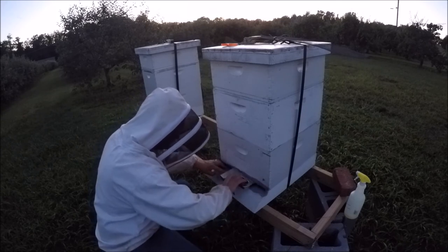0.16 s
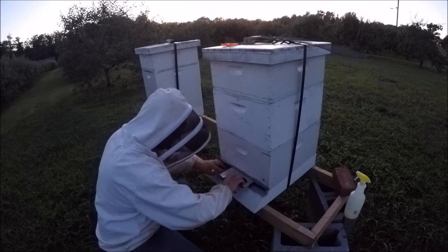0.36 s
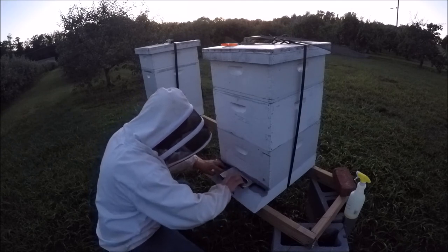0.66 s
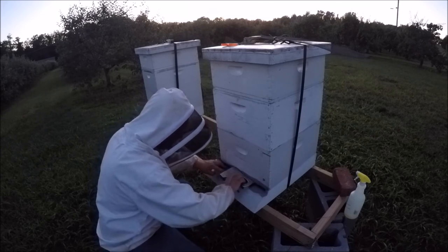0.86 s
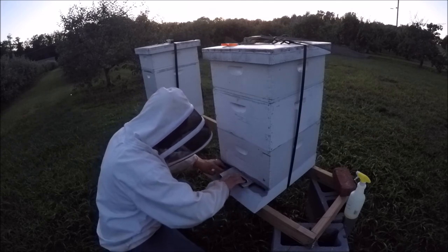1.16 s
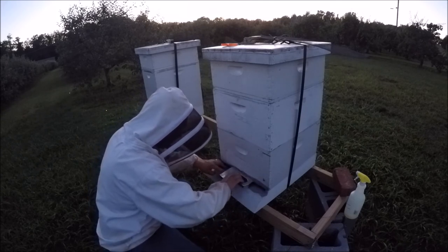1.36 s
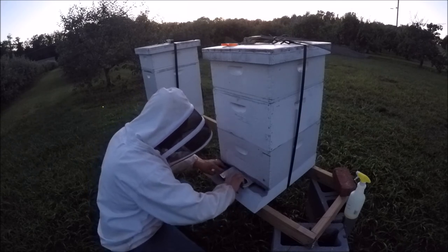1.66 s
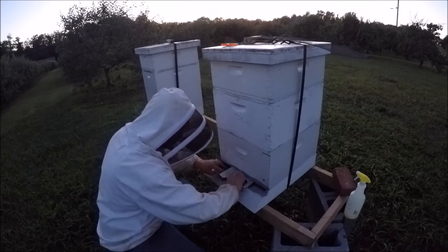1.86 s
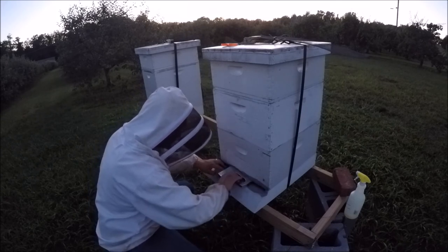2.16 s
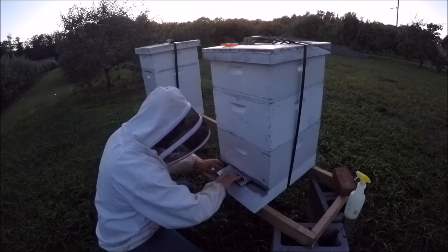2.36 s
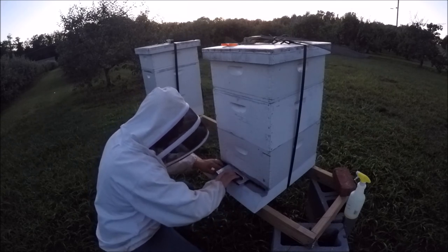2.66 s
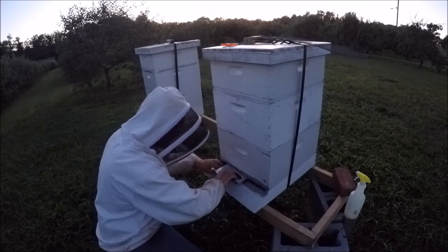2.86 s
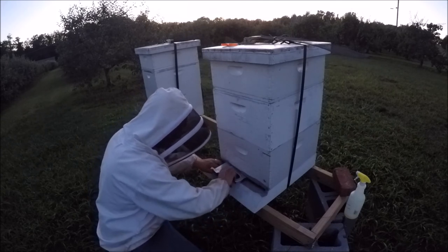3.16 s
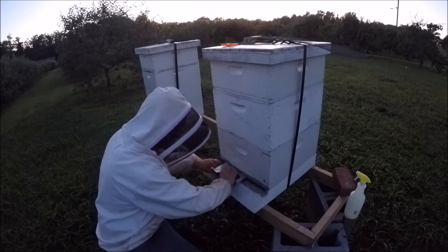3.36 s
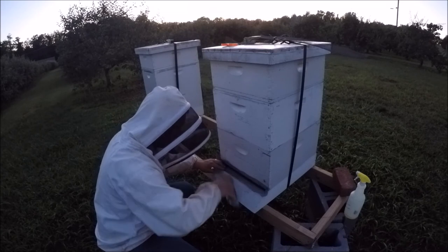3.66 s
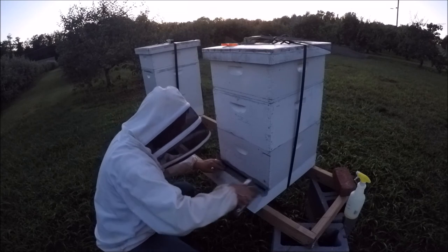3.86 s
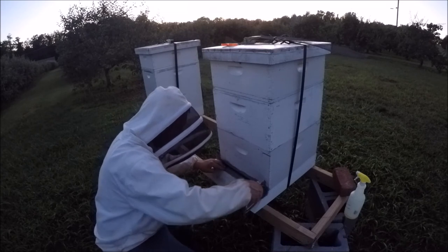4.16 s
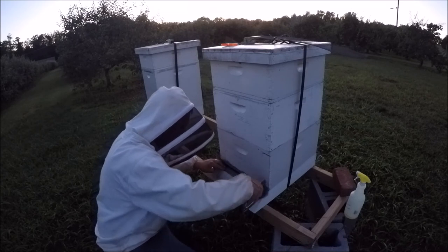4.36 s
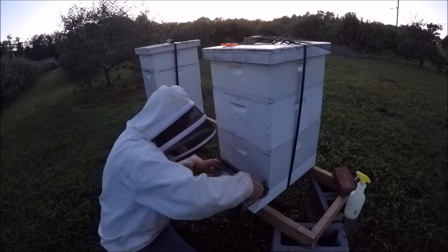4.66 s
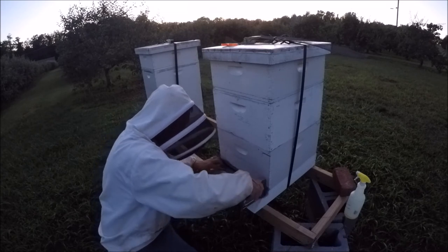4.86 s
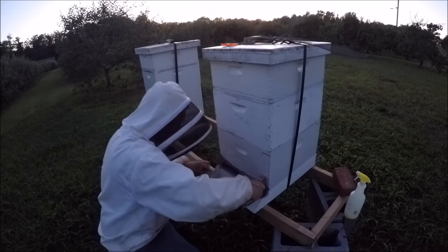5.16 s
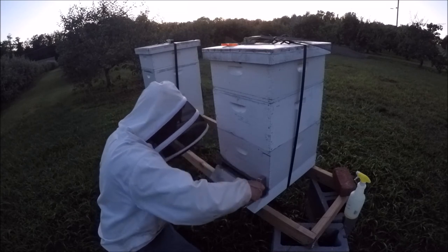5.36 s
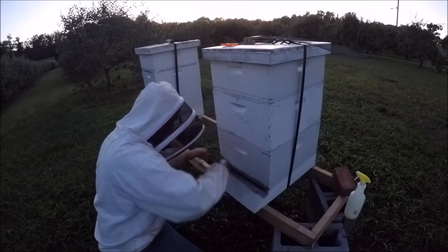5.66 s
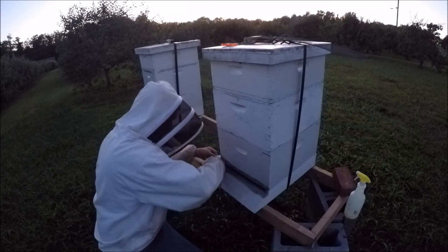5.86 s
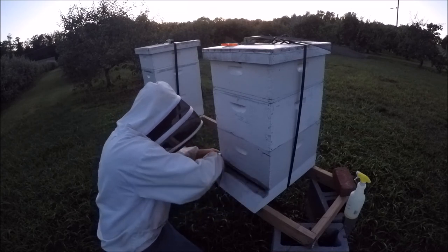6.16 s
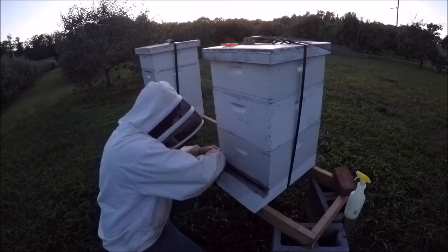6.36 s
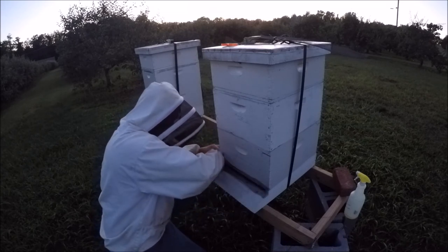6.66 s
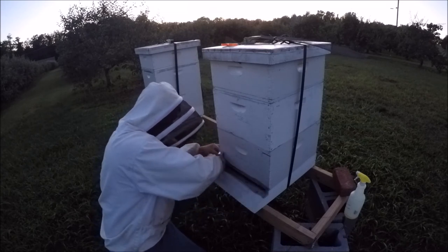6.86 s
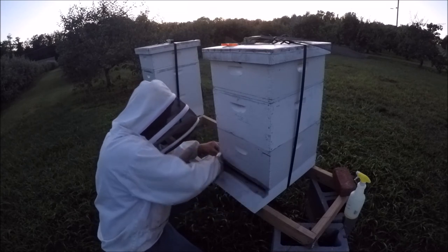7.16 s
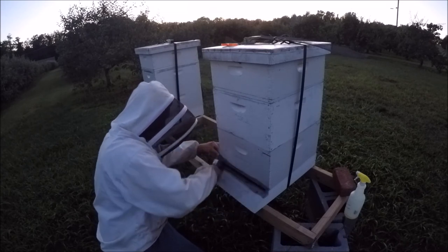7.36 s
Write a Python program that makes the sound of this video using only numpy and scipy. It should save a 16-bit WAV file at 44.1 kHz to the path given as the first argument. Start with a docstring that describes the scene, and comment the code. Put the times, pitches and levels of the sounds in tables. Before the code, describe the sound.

A hand stapler cracks four times into a boxy wooden hive, with metal clicks, wood bumps and sliding between, over a quiet rumbling field.

```python
"""A beekeeper staples a strip across the entrance of a wooden hive, outdoors, two metres from the microphone.
Throughout, the field rumbles and hisses (shaped noise) and bees hum in the box (wandering harmonic tones).
A small bird trills at the start (gliding tones), while gun and strip knock, click and slide (struck modes).
Staples slam home near 1.9, 3.4, 5.4 and 7.0 s (noise bursts and modes), clipping wherever they exceed full scale.
A sleeve rustles (shaped noise) after 4.2 s and again around 6 s; the bird trills once more from 5.7 s."""
import sys
import numpy as np
from scipy import signal
from scipy.fft import rfft, irfft, next_fast_len
from scipy.io import wavfile

SR = 44100
rng = np.random.default_rng(int(sys.argv[2]) if len(sys.argv) > 2 else 0)


def persist_wave(psi):
    """Save psi, clipped to +-1, as 16-bit WAV."""
    counts = np.round(np.clip(psi, -1, 1) * 32767).astype(np.int16)
    wavfile.write(sys.argv[1], SR, np.atleast_2d(counts).T)


N = 331191
TIME = np.arange(N) / SR  # seconds through the scene
AGE = TIME[:SR // 3]  # seconds since a blow


def undb(db):
    """Decibels to gain."""
    return 10 ** (np.asarray(db) / 20)


def unit(x):
    """Scale to rms 1."""
    return x / np.sqrt(np.mean(x ** 2))


def curve(table, t):
    """The columns of a table, joined by straight lines at times t."""
    s, *columns = np.transpose(table)
    return [np.interp(t, s, c) for c in columns]


def add(track, s, sound):
    """Mix a sound into the track at time s, cutting what falls outside."""
    i = int(s * SR)
    part = sound[max(-i, 0):max(N - i, 0)]
    start = max(i, 0)
    track[start:start + len(part)] += part


def noise(colour, t):
    """Noise of rms 1, as long as t, with a spectrum drawn through (pitch_hz, level_db) points."""
    hz, db = np.transpose(colour)
    size = next_fast_len(len(t))
    f = np.maximum(np.fft.rfftfreq(size, 1 / SR), 1)
    gain = undb(np.interp(np.log(f), np.log(hz), db))
    coloured = irfft(rfft(rng.standard_normal(size)) * gain, size)
    return unit(coloured[:len(t)])


def walk(rate):
    """A random wander with spread near 1, turning at most `rate` times a second."""
    knots = rng.standard_normal(1024)
    return np.interp(TIME * rate, np.arange(len(knots)), knots)


def fade(t60, t=AGE):
    """Exponential decay, down 60 dB after t60 seconds."""
    return np.exp(-np.log(1000) * t / t60)


def swell(t, length):
    """A smooth rise and fall around t = 0."""
    return np.cos(np.pi * np.clip(t / length, -.5, .5)) ** 2


def chirp(hz, db):
    """A pure gliding tone: the phase adds up the changing pitch."""
    return np.sin(2 * np.pi * np.cumsum(hz) / SR) * undb(db)


def ring(modes, scatter_db, phase_spread):
    """Decaying modes, starting near rms 1; each call weights and detunes them a little differently."""
    hz, db, t60 = np.transpose(modes)[:, :, None]
    size, phase, detune = rng.standard_normal((3, len(modes), 1))
    angle = 2 * np.pi * hz * (1 + 0.0031 * detune) * AGE + phase_spread * phase
    waves = np.cos(angle) * fade(t60)
    return np.sum(undb(db + scatter_db * size) * waves, axis=0) / np.sqrt(np.sum(undb(db) ** 2) / 2)


def tone(hz, db, t60):
    """One damped resonance that builds up within its first cycle."""
    return undb(db) * np.cos(2 * np.pi * hz * AGE) * fade(t60) * (1 - fade(.5 / hz))


def scatter(x, t60, db):
    """Diffuse reflections from the surroundings: a fading noise tail, thinner in the treble."""
    t = TIME[:SR]
    colour = [(60, 19.5), (400, 2), (1500, -5.5), (5000, -7.0), (15000, -5)]  # (pitch_hz, relative dB per Hz)
    tail = noise(colour, t) * fade(t60, t) * (1 - fade(0.11, t))
    return undb(db) * signal.fftconvolve(x, tail / np.sqrt(np.sum(tail ** 2)))[:N]


# colour of the open air: pitch_hz [Hz], level_db [relative dB per Hz]
AIR_COLOUR = [(12, -32.5), (20, 5), (57, 0), (160, -12.5), (229, -13), (294, -20), (445, -16), (540, -22.5),
              (713, -26), (796, -29), (1210, -22.5), (1420, -28), (4690, -33.5), (13400, -46.5),
              (15000, -47.5)]
# course of the distant hiss: time_s [s], level_db [dB, before the shared trim]
HISS_LEVEL = [(0, -59.5), (1.7, -62.5), (3.2, -61), (3.9, -65.5), (4.6, -65), (5.2, -59.5), (6.4, -61.5),
              (7.5, -61)]
# colour of the distant hiss: pitch_hz [Hz], level_db [relative dB per Hz]
HISS_COLOUR = [(200, -7.5), (500, -2), (800, 3), (1300, 3.5), (2500, -5.5), (4300, -3), (7000, -15),
               (15000, -19.5)]


def field(air_db=-51.5, hiss_trim_db=-3.5):
    """Low rumble of the open air and a distant hiss: two shaped noises whose levels waver."""
    hiss_db, = curve(HISS_LEVEL, TIME)
    air = noise(AIR_COLOUR, TIME) * undb(air_db + 0.96 * walk(11))
    return air + noise(HISS_COLOUR, TIME) * undb(hiss_db + hiss_trim_db + 1.1 * walk(17))


# the colony: time_s [s], wingbeat_hz [Hz, middle of the wander], level_db [dB, before the shared trim]
COLONY = [(0, 244, -52.5), (1.5, 234.5, -52.5), (3, 244.2, -51), (3.9, 241.2, -59), (4.4, 239.3, -55.5),
          (5.1, 225.1, -53), (6.3, 243.5, -56.5), (7.5, 246.4, -56)]


def bees(count=7, trim_db=-8):
    """Several bees in the box, each with its own wandering wingbeat, two overtones and changing loudness."""
    hz, db = curve(COLONY, TIME)
    hum = 0
    for _ in range(count):
        wingbeat = hz * (1 + 0.047 * walk(1.3) + 0.0086 * walk(23))
        phase = 2 * np.pi * np.cumsum(wingbeat) / SR
        buzz = np.sin(phase) + undb(-3.5) * np.sin(2 * phase) + undb(-15.0) * np.sin(3 * phase)
        hum = hum + buzz * undb(9.1 * walk(9))
    return unit(hum) * undb(db + trim_db)


SYLLABLE_S = .101  # from one syllable to the next
SWELL_FROM_S, SWELL_S, SWELL_DB = 5.7, .55, -6.5  # the later trill starts about this much softer and swells
# a syllable's parts: pitch at the middle, rise, length, and lead before the whistle
WHISTLE_HZ, WHISTLE_HZ_PER_S, WHISTLE_S = 6700, 80000, .024
NOTE_HZ, NOTE_HZ_PER_S, NOTE_S, NOTE_LEAD_S = 5220, 32000, .022, .029
BUZZ_HZ_PER_S, BUZZ_S, BUZZ_LEAD_S = 14000, .038, .043
# trills: start_s [s, first whistle], end_s [s], whistle_db [dB], buzz_db [dB, before its own 3 dB cut],
# buzz_pitch_hz [Hz], note_db [dB relative to buzz_db]
BIRD_TRILLS = [(0.052, 0.5, -47, -46.5, 4810, 2), (5.733, 7.6, -47, -54.5, 3965, -6)]


def bird(buzz_hz=212, swing_hz=600, uneven_db=1.8):
    """Evenly repeated syllables: a buzz of quick upsweeps, a short note, a rising whistle; the trees answer."""
    out, lead = np.zeros(N), .07  # seconds of room before the whistle
    t = TIME[:SR // 10] - lead
    cycle = 2 * np.pi * buzz_hz * t
    throb = 1 - .5 * np.cos(cycle)
    buzz_t, note_t = t + BUZZ_LEAD_S, t + NOTE_LEAD_S
    for first, last, whistle_db, buzz_db, centre_hz, note_db in BIRD_TRILLS:
        for s in np.arange(first, last, SYLLABLE_S):
            pitch, size = 1 + .008 * rng.standard_normal(), uneven_db * rng.standard_normal()
            softness = np.clip(1 - (s - SWELL_FROM_S) / SWELL_S, 0, 1) * (s > SWELL_FROM_S)
            sweep_hz = centre_hz + BUZZ_HZ_PER_S * buzz_t + swing_hz * signal.sawtooth(cycle, .8)
            buzz = chirp(sweep_hz, buzz_db) * throb * swell(buzz_t, BUZZ_S)
            note_hz = pitch * NOTE_HZ + NOTE_HZ_PER_S * note_t
            note = chirp(note_hz, buzz_db + note_db) * swell(note_t, NOTE_S)
            whistle = chirp(pitch * WHISTLE_HZ + WHISTLE_HZ_PER_S * t, whistle_db) * swell(t, WHISTLE_S)
            syllable = undb(-3) * buzz + note + whistle
            add(out, s - lead, undb(size + SWELL_DB * softness) * syllable)
    heard = out + scatter(out, t60=.25, db=-10)
    add(heard, .019, undb(-17) * out)  # one distinct echo
    return heard


# sleeve strokes: start_s [s], end_s [s], level_db [dB, before the flutter]
SLEEVE_STROKES = [(4.183, 4.398, -58), (5.86, 6.021, -59), (5.975, 6.233, -47), (6.48, 6.693, -57)]
# colour of the cloth: pitch_hz [Hz], level_db [relative dB per Hz]
CLOTH_COLOUR = [(60, -8), (130, 5), (250, 5), (420, -3), (650, 2.5), (850, -4.5), (1200, 3.5),
                (1800, -11.5), (4000, -19.5), (15000, -42)]


def sleeve(flutter_db=2):
    """Heavy cotton of the bee suit brushing on cotton: fluttering noise that swells, holds and ebbs."""
    strokes = np.zeros(N)
    for start, end, db in SLEEVE_STROKES:
        strokes += undb(db) * np.interp(TIME, np.linspace(start, end, 5), [0, 1, 1, 1, 0])
    return noise(CLOTH_COLOUR, TIME) * strokes * undb(flutter_db * walk(90))


# modes of the hollow box: pitch_hz [Hz], level_db [relative dB], t60_s [s]
BOX_MODES = [(252.5, -3.5, 0.051), (355, -4, 0.082), (393, 1.5, .065), (458, 0, .04), (509, -1, .055),
             (568.7, -3, 0.1), (620.8, 0.5, .06)]
# modes of the entrance board: pitch_hz [Hz], level_db [relative dB], t60_s [s]
BOARD_MODES = [(720, -9, .03), (864, -10.5, 0.061), (1038, -8, 0.047), (1159, 1, 0.052),
               (1299, -0.5, 0.043), (1394, -0.5, 0.036), (1538, -5.5, 0.034), (1703, -2.5, 0.031),
               (2020, -9.5, .035), (2266, -10, 0.032), (2385, -6.5, 0.027), (2560, -10, 0.038)]
# colour of splintering wood: pitch_hz [Hz], level_db [relative dB per Hz]
FIBRE_COLOUR = [(60, -23), (250, -7.5), (500, -1.5), (800, -7), (1400, 0.5), (2500, -6.5), (4500, -8),
                (8000, -34.5), (15000, -34.5)]


def wood(box_db, board_db, low_hz=190, high_hz=900):
    """A blow on the hive: the box booms, the board rings, the fibres crunch."""
    box = ring(BOX_MODES, scatter_db=0.77, phase_spread=1.0)
    # the box radiates little bass, and the soft contact gives it no treble
    box = signal.sosfilt(signal.butter(2, [low_hz, high_hz], "band", fs=SR, output="sos"), box)
    crunch = noise(FIBRE_COLOUR, AGE) * fade(.035) * undb(-4)
    board = ring(BOARD_MODES, scatter_db=1.1, phase_spread=1.5) * undb(4) + crunch
    return undb(box_db) * box + undb(board_db) * board * (1 - fade(.002))


# colour of steel on steel: pitch_hz [Hz], level_db [relative dB per Hz]
CRACK_COLOUR = [(100, -33), (300, -20), (900, -8.5), (1300, -8.5), (1700, -1.5), (2600, -0.5), (4000, 2.5),
                (5600, -1.5), (7500, -6.5), (11000, -10.5), (15000, -10)]


def crack(db, t60):
    """The dense noise burst of steel striking steel."""
    return undb(db) * noise(CRACK_COLOUR, AGE) * fade(t60) * (1 - fade(0.0004))


# modes of the steel gun: pitch_hz [Hz], level_db [relative dB], t60_s [s, before any added damping]
GUN_MODES = [(1630, -10, 0.11), (2320, -6.5, 0.043), (2540, -8.5, 0.071), (2900, -7, 0.013),
             (3480, 4.5, 0.043), (3655, -2.5, 0.054), (4286, -4.5, 0.14), (4460, -1.5, 0.021),
             (4000, -4, 0.023), (4170, -8, 0.031), (4915, 1.5, 0.017), (5130, -5, 0.021),
             (5245, -0.5, 0.044), (5700, -3.5, 0.057), (6100, -5, .05), (7220, -5.5, 0.039),
             (8400, -10.5, 0.026), (8040, -8.5, 0.026), (9200, -11, 0.017), (10160, -12.5, 0.046)]


def frame(db):
    """The short ring of the gun's steel frame."""
    return undb(db) * ring(GUN_MODES, scatter_db=-3.0, phase_spread=3.4) * (1 - fade(0.0016))


def steel(db, t60):
    """A light metal click, damped by the hand that grips the gun."""
    return crack(db, t60) + frame(db - 8) * fade(t60 * 2.2)


def knock(box_db, board_db, steel_db):
    """The gun bumps the hive: wood and steel sound together."""
    return wood(box_db, board_db) * fade(0.63) + steel(steel_db, t60=0.026)


# strip and gun sliding on wood: start_s [s], end_s [s], level_db [dB], box_db [relative dB, before a 4 dB lift]
SLIDES = [(0.0, 0.199, -57, 3), (0.273, 0.426, -59.5, 2), (0.947, 1.227, -53, 2.5),
          (1.239, 1.77, -68.5, -0.5), (2.08, 2.187, -43, 6), (2.209, 2.32, -56.5, -3),
          (2.395, 2.62, -58, -5), (2.795, 2.903, -56, 6), (2.949, 3.105, -51, -1), (3.205, 3.335, -65, 9),
          (3.638, 3.705, -57, -10)]


def rubbing(slips_per_s=600, uneven_db=5.5):
    """Sliding as small uneven slips at random moments, each a tiny blow on the wood."""
    out = np.zeros(N)
    for start, end, db, box_db in SLIDES:
        chance, size = rng.random(SR), np.clip(rng.standard_normal(SR), -2, 2)
        count = int(np.clip((end - start) * SR, SR / 50, SR))
        slips = (chance < slips_per_s / SR) * undb(uneven_db * size)
        slips = slips[:count] * signal.windows.tukey(count, .5)
        # low-pass the wood for a dull rasp
        rasp = signal.sosfilt(signal.butter(2, 2000, fs=SR, output="sos"), wood(box_db + 4.0, 0))
        sound = signal.fftconvolve(slips, rasp + steel(-3, t60=.015))
        add(out, start, undb(db) * sound / (np.std(sound[:count]) + 1e-9))
    return out


def catches(box_db=2, board_db=-4, steel_db=-12, per_s=22, above_slide_db=4, scatter_db=2):
    """While the strip slides, its edge catches on the grain at uneven moments and taps the wood."""
    out = np.zeros(N)
    for start, end, db, _ in SLIDES:
        shift, size = rng.random(32), rng.standard_normal(32)
        times = start + (np.arange(len(shift)) + shift) / per_s
        tap = undb(db + above_slide_db) * knock(box_db, board_db, steel_db)
        for s, gain in zip(times[times < end], undb(scatter_db * size)):
            add(out, s, gain * tap)
    return out


def faint_tone():
    """A faint steady tone near 525 Hz lingers after one knock and fades."""
    out = np.zeros(N)
    add(out, 1.14, tone(525, db=-45, t60=.45))
    return out


# tones of the bright ringing: pitch_hz [Hz], level_db [relative dB], t60_s [s]
BRIGHT_RING_MODES = [(2030, -5, 0.16), (3435, -5, 0.14), (3973, -1, 0.084), (4533, -8, 0.16),
                     (5308, -9, 0.14), (7090, -11, 0.031), (11600, -2, 0.074)]


def bright_ring(start_s=6.007, level_db=-39):
    """A faint bright ringing of a few steady high tones, dying away quickly."""
    out = np.zeros(N)
    add(out, start_s, undb(level_db) * ring(BRIGHT_RING_MODES, scatter_db=-0.5, phase_spread=3))
    return out


# bumps on the hive: start_s [s], box_db [dB], board_db [dB], steel_db [dB], stand_thump_db [dB]
BUMPS = [(0.031, -37, -53, -64, -55), (0.4828, -17.5, -26, -36.5, -27), (0.9156, -10, -13.5, -28, -30),
         (1.06, -42, -47, -66, -45), (1.138, -29, -38, -27, -56), (1.247, -43, -48.5, -53, -39),
         (1.391, -42.5, -55, -45.5, -61), (2.122, -32.5, -42, -60, -46), (2.146, -35, -39, -45, -59),
         (2.156, -31.5, -40, -49, -61), (2.172, -32, -39.5, -59, -52), (2.399, -26, -37, -65, -43),
         (2.538, -44, -41, -50, -61), (2.566, -46.5, -45.5, -44.5, -52.5), (2.788, -38.5, -47, -54, -43),
         (4.425, -50, -53, -51, -31.5), (5.495, -41, -66, -72.5, -37), (6.002, -31, -39, -44, -23)]


def knocks(stand_hz=205, bounce_above_db=-22, bounce_s=.0127, bounce_db=-4.5):
    """Gun and strip bump the hive and thump its stand; a hard knock bounces once, later and weaker."""
    out = np.zeros(N)
    for s, box_db, board_db, steel_db, thump_db in BUMPS:
        add(out, s, knock(box_db, board_db, steel_db) + tone(stand_hz, thump_db, t60=.08))
        if box_db > bounce_above_db:
            # the bounce has even less board in it
            add(out, s + bounce_s, undb(bounce_db) * knock(box_db, board_db - 3, steel_db))
    return out


# steel clicks of lever, latch and staple: start_s [s], level_db [dB], board_db [dB], t60_s [s, of the steel burst]
GUN_CLICKS = [(0.547, -43.5, -44.5, 0.063), (0.974, -46, -42, .035), (1.001, -44, -48, .03),
              (1.13, -45, -46, .07), (1.244, -39, -48, 0.035), (1.694, -49.5, -44, .048),
              (1.813, -39.5, -62, 0.022), (1.8469, -11, -24.5, 0.0082), (2.363, -42.5, -60, 0.034),
              (3.067, -47.5, -40, .017), (3.3403, -17.5, -31.5, 0.014), (3.623, -34.5, -50, 0.028),
              (3.635, -28.5, -52.5, .022), (4.203, -48, -58, .03), (4.421, -40, -56, 0.042),
              (5.322, -19.5, -41, .03), (5.55, -42.5, -64, 0.038), (5.637, -34, -47, 0.036),
              (5.658, -30, -50.5, 0.034), (5.698, -43.5, -57.5, .022), (6.007, -37.5, -37.5, 0.036),
              (6.9596, -19, -27, 0.029), (7.322, -26, -45, 0.038)]


def clicks():
    """Small steel parts click and the wood answers with a short dull blow."""
    out = np.zeros(N)
    for s, db, board_db, t60 in GUN_CLICKS:
        add(out, s, steel(db, t60) + wood(board_db - 12, board_db) * fade(t60 * 2))
    return out


# colour of the lingering hiss: pitch_hz [Hz], level_db [relative dB per Hz]
HANG_COLOUR = [(30, 15.5), (150, 8.5), (400, 4.5), (1500, 0), (4500, 0), (8000, -8.5), (15000, -13.5)]
# staple shots: start_s [s], box_db [dB], board_db [dB], steel_db [dB, of the staple strike],
# rattle_db [dB, of the spring], hiss_db [dB, lingering], then three resonances of the stapled spot:
# thump_hz [Hz], thump_db [dB] of the stand, bend_hz [Hz], bend_db [dB] and ring_hz [Hz], ring_db [dB] of the plank
STAPLE_SHOTS = [(1.8666, -6, -8, -5, -46, -49.5, 121.8, -30, 465, -8, 1177, -3.5),
                (3.3563, -7.5, -6, -5.5, -47, -50.5, 124.9, -30.5, 378.6, -13.5, 1220, -4.5),
                (5.371, -25, -30, 0, -28.5, -64, 204, -22.5, 405, -13.5, 1604, -14),
                (7.024, -21.5, -8.5, -2.5, -33.5, -66, 129, -21, 524, -9.5, 1225, -4.5)]


def shots(travel_s=.0024, rebound_s=0.0083, hang_s=0.19):
    """The spring lets go, the driver sinks the staple and rebounds; the spring rattles and a hiss lingers."""
    out = np.zeros(N)
    hold = np.clip((hang_s - AGE) / 0.024 + 1, 0, 1)  # the hiss stays level, then drops away
    for (s, box_db, board_db, steel_db, rattle_db, hiss_db,
         thump_hz, thump_db, bend_hz, bend_db, ring_hz, ring_db) in STAPLE_SHOTS:
        thump = tone(thump_hz, thump_db, t60=0.085)
        spot = thump + tone(bend_hz, bend_db, t60=0.042) + tone(ring_hz, ring_db, t60=0.03)
        sway = tone(50, box_db - 19, t60=.2)  # the whole hive rocks
        gun = frame(steel_db - 1) * fade(.06)
        release = crack(steel_db - 5.0, t60=0.04)
        strike = crack(steel_db, t60=0.019) + gun + wood(box_db, board_db) * fade(.12) + spot + sway
        rebound = crack(steel_db - 3.0, t60=0.0049)
        rattle = crack(rattle_db, t60=0.22) + tone(1600, rattle_db - 18.5, t60=.4)
        add(out, s, release)
        add(out, s + travel_s, strike)
        add(out, s + rebound_s, rebound + rattle)
        add(out, s, undb(hiss_db) * noise(HANG_COLOUR, AGE) * hold)
    return out


def scene():
    """The work at the hive, thrown back by the boxes and the far trees, over bird, bees and field."""
    handling = clicks() + knocks() + bright_ring() + faint_tone()
    work = shots() + handling + rubbing() + catches() + sleeve()
    echoes = scatter(work, t60=.11, db=-22.0) + scatter(work, t60=.9, db=-39.5)
    return (work + echoes + bird() + bees() + field())[None]


def record(dry, top_hz=15400):
    """Whatever exceeds full scale is clipped flat; then the top of the treble is cut steeply."""
    clipped = np.clip(dry, -1, 1)
    return signal.sosfilt(signal.ellip(8, .2, 70, top_hz, fs=SR, output="sos"), clipped)


dry = scene()
out = record(dry)
persist_wave(out)
```